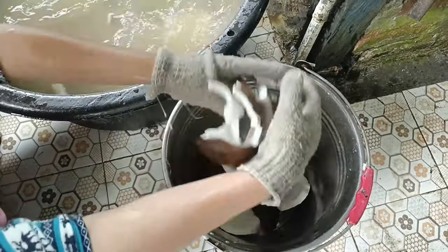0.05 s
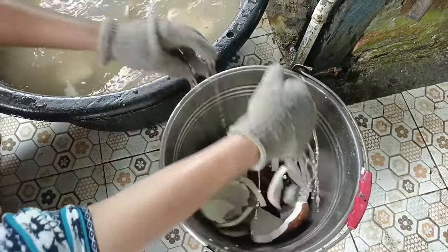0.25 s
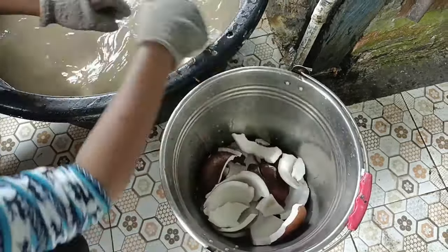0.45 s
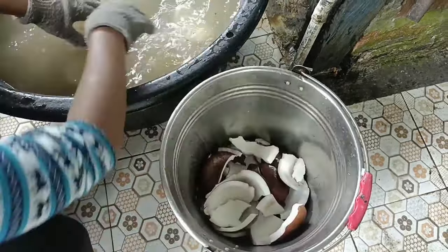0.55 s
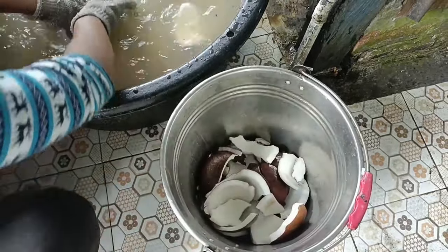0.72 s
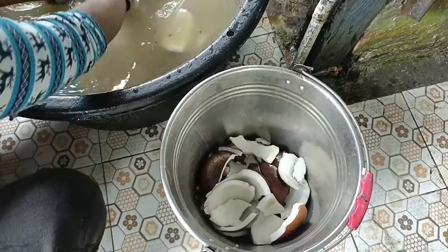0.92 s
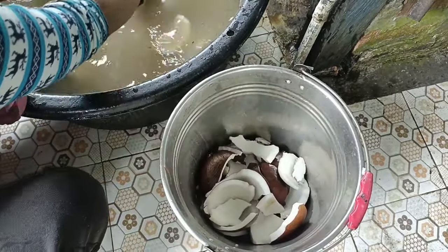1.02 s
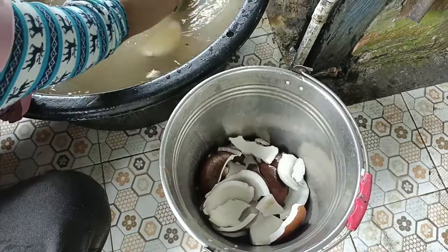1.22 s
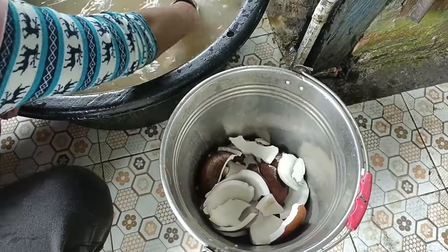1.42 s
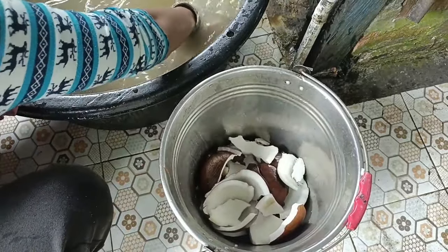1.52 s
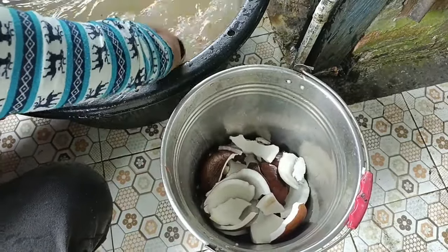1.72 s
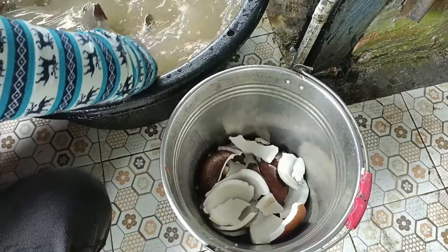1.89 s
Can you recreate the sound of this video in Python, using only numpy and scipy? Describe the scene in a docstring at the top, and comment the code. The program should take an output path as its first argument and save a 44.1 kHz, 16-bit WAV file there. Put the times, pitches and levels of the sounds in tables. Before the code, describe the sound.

Wet coconut chunks clatter into a metal bucket, then water quietly gurgles and drips in a basin

```python
"""Wet chunks of coconut tumble into a half-full metal bucket, close below a phone; then gloved hands stir the basin.
Chunks: clunks that excite damped bucket modes, and noise ticks in three bands for the clatter.
Narrow pitched runs of damped sines: ringing ends of the bucket clatter near 0.52 s, water gurgles elsewhere.
Water: single damped sines (plops and plips), low noise (slosh), bright grains (spray, drops) and fizz in
flickering narrow bands (murmur); a faint rumble lies below.
"""
import sys
import numpy as np
from scipy import signal
from scipy.fft import rfft, irfft
from scipy.io import wavfile
from scipy.ndimage import uniform_filter1d

SR = 44100
rng = np.random.default_rng(int(sys.argv[2]) if len(sys.argv) > 2 else 0)


def dump(signal):
    """Clip the signal to [-1, 1] and save it as 16-bit WAV at the path in sys.argv[1]."""
    limited = np.clip(np.atleast_2d(signal).T, -1, 1)
    pcm = np.round(limited * 32767).astype(np.int16)
    wavfile.write(sys.argv[1], SR, pcm)


N = 85995
T = np.arange(N) / SR

# Levels are relative; colour tables are normalised to rms 1. Positive left-right is louder at the left.
# narrow pitched runs, ringing ends of the bucket clatter near 0.52 s, water gurgles elsewhere:
# (start [s], length [s], mean pitch [Hz], level [dB], left-right [dB])
PITCHED_RUNS = [(0.0, 0.024, 4190, -42, -6), (0.064, 0.1, 6200, -43.5, 0), (0.078, 0.058, 776, -49, 3),
                (0.093, 0.099, 4548, -33.5, -5), (0.094, 0.064, 5340, -38.5, -11),
                (0.103, 0.06, 3210, -43, -3), (0.139, 0.088, 3970, -32, -8), (0.147, 0.052, 5730, -42, -4),
                (0.159, 0.029, 4280, -27, -1), (0.162, 0.034, 1984, -38, -5),
                (0.162, 0.041, 1152, -33.5, 7), (0.163, 0.038, 1356, -40, 2), (0.165, 0.032, 1680, -43, 9),
                (0.518, 0.049, 4290, -36.5, -6.5), (0.523, 0.05, 3226, -39, -4),
                (0.526, 0.072, 880, -51, 7), (0.638, 0.077, 3820, -52, -28), (0.64, 0.17, 3045, -41, 6.5),
                (0.65, 0.028, 4520, -38, -9.5), (0.696, 0.045, 1444, -49, 0), (0.697, 0.12, 4493, -42, -9),
                (0.718, 0.16, 5380, -43.5, -11.5), (0.719, 0.032, 2070, -38.5, 12),
                (0.719, 0.09, 4900, -42, -3), (0.737, 0.05, 1650, -51, 8), (0.761, 0.05, 2600, -49.5, 18.5),
                (0.768, 0.12, 2098, -52, 9), (0.83, 0.072, 5390, -56, -1), (0.91, 0.06, 2090, -45, 0),
                (0.908, 0.07, 5405, -45.5, -10), (1.004, 0.03, 2416, -46.5, -10),
                (1.034, 0.061, 4070, -39.5, -9.5), (1.035, 0.1, 5400, -47, -9), (1.05, 0.05, 1300, -46, 0),
                (1.054, 0.048, 3880, -34, -1.5), (1.062, 0.07, 2920, -41.5, 16),
                (1.065, 0.039, 2610, -44.5, -14.5), (1.067, 0.043, 3430, -29.5, -0.5),
                (1.135, 0.069, 777, -42.5, 4), (1.144, 0.033, 4440, -43, -8),
                (1.148, 0.054, 3170, -35, -7.5), (1.215, 0.037, 759, -41, 2), (1.254, 0.22, 779, -41.5, 4),
                (1.277, 0.16, 5500, -46, -11), (1.279, 0.036, 4020, -54, -15), (1.285, 0.04, 5900, -45, -3),
                (1.286, 0.057, 1957, -41, -13), (1.305, 0.12, 936, -41.5, 2.5), (1.319, 0.031, 627, -40, 0),
                (1.324, 0.034, 795, -38, -3), (1.33, 0.048, 1623, -39.5, 6),
                (1.365, 0.05, 3770, -47.5, -12), (1.368, 0.056, 2006, -39.5, 0),
                (1.407, 0.032, 3970, -42, -10.5), (1.442, 0.093, 873, -45, 5), (1.513, 0.1, 1000, -45, 15),
                (1.517, 0.028, 1414, -35, -2), (1.533, 0.05, 3730, -40.5, -5),
                (1.553, 0.065, 910, -34.5, -0.5), (1.555, 0.06, 4350, -44, -3),
                (1.556, 0.025, 3260, -45.5, 19), (1.574, 0.046, 1983, -34.5, 2),
                (1.626, 0.036, 3390, -39, 2), (1.625, 0.081, 1376, -45, 4), (1.651, 0.17, 781, -56, 15),
                (1.7, 0.04, 5680, -52, -4), (1.701, 0.042, 4360, -40.5, -10), (1.706, 0.076, 2880, -48, 23),
                (1.783, 0.038, 1837, -33.5, -1), (1.788, 0.045, 4705, -40, -10),
                (1.797, 0.048, 5050, -54, 2), (1.823, 0.063, 849.5, -49, 20), (1.845, 0.05, 2350, -40, 9),
                (1.85, 0.033, 6540, -34.5, -2), (1.867, 0.086, 3014, -47, 18),
                (1.871, 0.025, 3400, -40, -8), (1.903, 0.048, 5400, -43, -8.5),
                (1.896, 0.055, 2128, -31, 7.5), (1.9, 0.067, 4410, -39, -8), (1.904, 0.04, 3860, -40, -14),
                (1.906, 0.034, 1980, -33, -8), (1.934, 0.015, 1510, -37.5, 13)]
# plops and plips, single bubbles, low and high: (time [s], level [dB], initial pitch [Hz], decay constant [ms])
SINGLE_BUBBLES = [(0.092, -39, 4540, 4.5), (0.638, -38.5, 4510, 6), (1.055, -28, 3940, 4.7),
                  (1.144, -37, 4320, 5.4), (1.26, -33, 814, 3.9), (1.31, -16.5, 727, 5.5),
                  (1.518, -20.5, 845, 5.6), (1.703, -37, 4560, 5.6), (1.786, -24, 1857, 8.4),
                  (1.9, -36, 2100, 7.4)]
# slosh against the tub, two stretches: (time [s], level of the low band [dB], level of the high band [dB])
SLOSH_LEVELS = [
    [(0.0, -47, -52), (0.026, -45.5, -78), (0.042, -53, -84), (0.058, -49, -80), (0.092, -45, -43.5),
     (0.11, -50, -47), (0.152, -48, -51.5), (0.17, -62, -51.5), (0.184, -63, -35.5), (0.2, -27, -51)],
    [(0.5, -56, -38), (0.552, -63, -44), (0.62, -54, -77), (0.66, -58.5, -70), (0.704, -55.5, -90),
     (0.73, -57, -71), (0.762, -79, -64), (0.838, -75.5, -87), (0.89, -70, -81), (0.916, -54.5, -79),
     (0.94, -60, -69), (0.964, -67.5, -89), (1.004, -75, -63.5), (1.024, -70.5, -83), (1.084, -52.5, -75.5),
     (1.116, -63, -76), (1.142, -43.5, -55), (1.162, -41, -53), (1.186, -52, -64), (1.214, -41, -31.5),
     (1.262, -43, -38.5), (1.29, -43.5, -47), (1.326, -73, -34.5), (1.372, -50, -47.5), (1.392, -50.5, -67),
     (1.428, -65, -59), (1.48, -54, -79), (1.508, -54, -70), (1.546, -68, -69.5), (1.61, -40.5, -48.5),
     (1.658, -50.5, -56), (1.738, -48, -56), (1.76, -47, -67), (1.816, -59, -49.5), (1.832, -66, -52.5),
     (1.868, -61, -65), (1.924, -52, -57), (1.95, -52, -63)],
]
# slosh, low band spectrum: (frequency [Hz], density [dB per Hz])
SLOSH_LOW_COLOUR = [(25, -20), (50, -20), (80, -7.5), (110, 2.5), (160, 1), (230, -11.5)]
# slosh, high band spectrum: (frequency [Hz], density [dB per Hz])
SLOSH_HIGH_COLOUR = [(170, -20.5), (240, 8), (340, 4.5), (480, -11.5), (650, -23.5)]
# rumble spectrum: (frequency [Hz], density [dB per Hz])
RUMBLE_COLOUR = [(20, -6.5), (40, -5), (70, -0.5), (110, -11.5)]
# fine spray, two stretches: (time [s], level [dB])
SPRAY_LEVELS = [
    [(0.0, -53), (0.016, -56), (0.056, -62), (0.062, -65), (0.066, -56), (0.076, -54), (0.122, -52),
     (0.13, -57), (0.174, -53), (0.184, -61), (0.2, -47)],
    [(0.5, -55), (0.616, -61.5), (0.652, -55), (0.734, -53.5), (0.774, -62), (0.79, -54), (0.818, -65.5),
     (0.886, -48), (0.936, -64), (0.984, -58.5), (0.992, -72), (1.008, -52.5), (1.04, -56), (1.116, -63),
     (1.126, -56), (1.302, -63), (1.318, -52.5), (1.368, -62), (1.444, -55.5), (1.554, -48.5), (1.586, -59),
     (1.63, -47), (1.674, -56), (1.748, -57.5), (1.772, -61), (1.804, -52), (1.824, -56.5), (1.86, -51.5),
     (1.916, -57), (1.95, -58)],
]
# spray and drop spectrum: (frequency [Hz], density [dB per Hz])
DROPLET_COLOUR = [(3240, -41), (5500, -22), (6230, -28), (6580, -10.5), (7140, -23.5), (7830, 1.5),
                  (9370, -10), (10400, 1), (11500, -10), (12400, -5.5), (15200, -16), (16200, -23),
                  (16500, -36)]
# water murmur, two stretches: (time [s], level [dB])
MURMUR_LEVELS = [
    [(0.0, -58.5), (0.096, -57.5), (0.15, -54.5), (0.2, -42.5)],
    [(0.5, -52.5), (0.58, -61.5), (0.734, -55.5), (0.988, -61), (1.122, -54), (1.234, -58), (1.368, -57),
     (1.52, -54), (1.626, -55.5), (1.738, -55), (1.95, -51)],
]
# murmur spectrum: (frequency [Hz], density [dB per Hz])
MURMUR_COLOUR = [(240, -41.5), (400, -12), (546, -16), (861, -12.5), (1070, -15), (1200, -12.5),
                 (1370, 1.5), (1790, -7.5), (2060, -3.5), (2780, -9), (4550, -7.5), (5010, -18),
                 (5510, -5.5), (6060, -16), (7000, -9), (9100, -42.5), (15400, -120)]
# murmur balance: (frequency [Hz], left-right [dB])
MURMUR_BALANCE = [(400, 2), (1200, -1), (2500, -1), (4500, -3.5), (7000, -11)]
# droplets: (time [s], level [dB], left-right [dB])
DROP_TICKS = [(0.0645, -24, 14), (0.1521, -31.5, 7), (0.1698, -27.5, 6), (0.1945, -34, 1.0),
              (0.209, -35, 3), (0.4, -31, -0.5), (0.4622, -27, 13), (0.5392, -40, 11), (0.6509, -34, 10),
              (0.6828, -31, 11), (0.7259, -32, -4.0), (0.7873, -36, 0.5), (0.8556, -38, -6),
              (0.885, -30, 15), (1.0072, -28, -0.5), (1.1243, -47, 26), (1.1503, -37, 13),
              (1.3169, -43, -9), (1.4485, -28, 11), (1.5158, -31, -9), (1.6082, -25, 2), (1.6247, -22, 10),
              (1.7389, -37, 14), (1.8048, -26.5, -9), (1.8537, -36, 12)]
# clatter of small wet chunks: (time [s], low-middle level [dB], high-middle level [dB], treble level [dB])
CLATTER_LEVELS = [(0.195, -49, -40, -54), (0.209, -40.5, -40, -25.5), (0.217, -28.5, -34, -40.5),
                  (0.225, -29, -28, -30.5), (0.235, -15.5, -26.5, -30.5), (0.249, -28, -31, -37),
                  (0.271, -17, -16, -25.5), (0.281, -15.5, -15.5, -23), (0.315, -17, -18.5, -20.5),
                  (0.347, -23.5, -25, -36), (0.371, -22, -28, -42.5), (0.393, -29, -35.5, -36.5),
                  (0.423, -36, -37, -40.5), (0.435, -25.5, -25, -40), (0.443, -31, -36.5, -42.5),
                  (0.469, -34, -37.5, -46.5), (0.517, -50, -56.5, -53), (0.523, -47, -51, -61),
                  (0.58, -78, -72, -71)]
# clatter, low-middle spectrum: (frequency [Hz], density [dB per Hz])
CLATTER_LOW_COLOUR = [(600, -14.5), (900, -5.5), (1290, 0.5), (1600, -6.5), (2300, -11)]
# clatter, high-middle spectrum: (frequency [Hz], density [dB per Hz])
CLATTER_MID_COLOUR = [(1500, -13), (2100, -2), (3300, -3), (4500, -7.5), (5800, -25.5)]
# clatter, treble spectrum: (frequency [Hz], density [dB per Hz])
CLATTER_TOP_COLOUR = [(2650, -39.5), (4500, -6), (8640, -12), (9410, -20), (10500, -11.5), (13900, -18.5),
                      (15500, -26), (16000, -36)]
# knocks of the larger chunks: (time [s], level [dB], contact [ms], chunk pitch [Hz])
CHUNK_KNOCKS = [(0.207, -11, 2.5, 302), (0.216, -9.5, .8, 1160), (0.223, -9, 1.2, 601),
                (0.229, 4.5, 1.5, 333.7), (.239, -4, .9, 510.3), (0.244, -1.5, .7, 860),
                (0.253, -12.5, 1.5, 330), (.262, -5.5, .8, 907), (0.268, -2, 1.5, 284),
                (.282, -4.5, 1.5, 321), (0.303, -8, .5, 1250), (.316, -5.5, .9, 412),
                (.319, -9.5, .6, 1210), (.328, -11.5, .8, 790), (.341, -4, .8, 695), (.347, -11, 1.5, 335),
                (0.364, -33.5, .8, 920), (.379, -21, .8, 390), (0.39, -21.5, 1.1, 450),
                (.402, -17.5, .8, 810), (.421, -12, 2.5, 286), (.429, -4, 1.43, 609.5),
                (.436, -9, 0.88, 448.4), (.444, -15, 2.5, 313), (.456, -23, 4.3, 283),
                (0.48, -20, 0.96, 336)]
# modes of bucket and heap: (mean frequency [Hz], mean level [dB], t60 before wet damping [s])
BUCKET_MODES = [(130.5, -22.5, .15), (205, -12.5, .12), (264.6, -3.5, 0.13), (296, -7, 0.25),
                (354.6, -12, 0.14), (420.2, -12, 0.3), (495.4, -7, .1), (601, -11.5, 0.15), (711, -6, 0.11),
                (790.6, -15, 0.18), (835, -20.5, 0.25), (840, -18.5, 0.6), (995, -15, .08), (1105, -11, .1),
                (1283, -4.5, 0.09), (1554, -11.5, .08)]

RUN_RINGS, RING_SCATTER_DB, RUN_FADE_DB = 24, 4, 11.5
RING_DECAY_AT_2KHZ_S, RING_SPREAD_AT_2KHZ_HZ = 0.015, 70
SWELL_CYCLES = 1.3  # onset of a ring
SINGLE_GLIDE = 0.015  # phase stretch per decay constant
LEFT_LAG_S = .00018  # the basin reaches the left port later
RUMBLE_DB = -62
SPRAY_PER_S, SPRAY_SPREAD_DB = 5000, 2.5
MURMUR_FLICKER_DB = 3.5
DROP_DECAY_S, DROP_TAIL_DECAY_S, DROP_TAIL_DB = 0.00082, .012, -13
CLATTER_PER_S, CLATTER_SPREAD_DB, CLATTER_TAIL_S = 2500, 3.5, .003
MODE_SCATTER_DB, MODE_DETUNE = 6, 0.02068  # detune as a fraction of frequency
CHUNK_DB, CHUNK_CYCLES = -0.5, 2.5
WET_DAMP_S = .17  # the wet heap chokes every ring after about this long
CEILING, LOW_HZ, TOP_HZ = .78, 85, 15900


def undb(db):
    """dB to gain."""
    return 10 ** (np.asarray(db) / 20)


def unit(x):
    """Scale to rms 1."""
    return x / np.sqrt(np.mean(x ** 2))


def colour(x, table):
    """Filter by (Hz, dB) points on a log frequency axis, -90 dB outside them; rms 1."""
    hz, db = np.array(table, float).T
    log_hz = np.log(np.arange(N // 2 + 1) * SR / N + 1)
    gain = undb(np.interp(log_hz, np.log(hz), db, left=-90, right=-90))
    return unit(irfft(rfft(x) * gain, N))


def curve(table, column):
    """Gain over time from one dB column; -120 dB outside the table."""
    rows = np.array(table, float)
    return undb(np.interp(T, rows[:, 0], rows[:, column], left=-120, right=-120))


def stretches(tables, column):
    """Summed gain curves of separate stretches of time."""
    return sum(curve(table, column) for table in tables)


def add(out, start_s, x):
    """Mix x into out from start_s."""
    i = int(start_s * SR)
    out[..., i:i + x.shape[-1]] += x[..., :max(N - i, 0)]


def pair(correlation):
    """Left and right noise of the given correlation."""
    correlation = np.clip(correlation, 0, 1)
    mid, side = rng.standard_normal((2, N))
    return np.sqrt(1 + correlation) * mid + np.sqrt(1 - correlation) * side * np.array([[1], [-1]])


def grains(per_s, spread_db, tail_s):
    """Envelope of random ticks with exponential tails."""
    hits = rng.random(N) < per_s / SR
    ticks = hits * undb(spread_db * rng.exponential(size=N))
    return signal.lfilter([1], [1, -np.exp(-1 / (tail_s * SR))], ticks)


def walk(rate_hz):
    """Slow random wander, spread near 1."""
    k = int(SR / rate_hz)
    steps = np.repeat(rng.standard_normal(N // k + 1), k)
    return 1.52 * uniform_filter1d(uniform_filter1d(steps, k), k)[:N]


def panned(db):
    """Left and right gains."""
    return undb(np.array([[db / 2], [-db / 2]]))


def damped_ring(t, hz, decay_s, glide):
    """Damped sine that swells from t = 0 at both ports; positive glide raises the pitch."""
    u = np.maximum(np.array([t - LEFT_LAG_S, t]), 0)
    swell = 1 - np.exp(-(u * hz / SWELL_CYCLES) ** 2)
    phase = 2 * np.pi * hz * u * (1 + glide * u / decay_s)
    return swell * np.exp(-u / decay_s) * np.sin(phase)


def pitched_runs():
    """Gurgles and ringing bucket ends: fading runs of damped sines of near pitch; higher ones decay faster."""
    out = np.zeros((2, N))
    chance = rng.standard_normal((len(PITCHED_RUNS), 3, RUN_RINGS, 1))
    place = np.arange(RUN_RINGS)[:, None] / RUN_RINGS
    for (s, length_s, hz, level_db, pan_db), (shift, detune, scatter) in zip(PITCHED_RUNS, chance):
        onset_s = np.clip(place + 0.032 * shift, 0, 1) * length_s
        t = T[:int((length_s + .06) * SR)] - onset_s
        f = hz + RING_SPREAD_AT_2KHZ_HZ * detune * (hz / 2000) ** .5
        decay_s = RING_DECAY_AT_2KHZ_S * (hz / 2000) ** -.4
        size_db = level_db - 7 - RUN_FADE_DB * place + RING_SCATTER_DB * scatter
        size = undb(size_db) * np.sqrt(length_s / 0.062)
        run = (size * damped_ring(t, f, decay_s, 0)).sum(axis=1)
        add(out, s, run * panned(pan_db))
    return out


def plops_and_plips():
    """Single bubbles, low and high, each a damped sine of rising pitch."""
    out = np.zeros((2, N))
    for s, level_db, hz, decay_ms in SINGLE_BUBBLES:
        add(out, s, undb(level_db) * damped_ring(T[:SR // 8], hz, decay_ms / 1000, SINGLE_GLIDE))
    return out


def slosh():
    """Lapping against the tub: low noise in two bands, partly shared by the ports."""
    low = colour(pair(0.63), SLOSH_LOW_COLOUR)
    high = colour(pair(0.42), SLOSH_HIGH_COLOUR)
    return low * stretches(SLOSH_LEVELS, 1) + high * stretches(SLOSH_LEVELS, 2)


def rumble():
    """Faint steady noise in the bass."""
    return colour(pair(.6), RUMBLE_COLOUR) * undb(RUMBLE_DB)


def spray():
    """Fine crackle of droplets: dense noise grains, a little to the left."""
    hiss = colour(grains(SPRAY_PER_S, SPRAY_SPREAD_DB, .002) * pair(.3), DROPLET_COLOUR)
    return hiss * stretches(SPRAY_LEVELS, 1) * panned(2.5)


def murmur():
    """Fine fizz of noise grains in narrow bands that flicker each on its own."""
    spec = rfft(colour(grains(4000, 3.5, 0.0028) * pair(.1), MURMUR_COLOUR))
    hz = np.arange(N // 2 + 1) * SR / N + 1
    balance_db = np.interp(hz, *np.array(MURMUR_BALANCE).T)
    spec = spec * undb(balance_db * np.array([[.5], [-.5]]))
    fizz = np.zeros((2, N))
    for k in range(59, 91):  # triangular bands, 1/7 octave apart
        band = irfft(spec * np.clip(1 - 7 * abs(np.log2(hz) - k / 7), 0, 1), N)
        fizz += band * undb(MURMUR_FLICKER_DB * walk(22))
    return fizz * stretches(MURMUR_LEVELS, 1)


def drops():
    """Droplets: short bright noise ticks with a wisp of spray after them."""
    out, t = np.zeros((2, N)), T[:3000]
    hiss = colour(pair(.3), DROPLET_COLOUR)
    shape = np.exp(-t / DROP_DECAY_S) + undb(DROP_TAIL_DB) * np.exp(-t / DROP_TAIL_DECAY_S)
    for s, level_db, pan_db in DROP_TICKS:
        i = int(s * SR)
        add(out, s, undb(level_db - 10.5) * hiss[:, i:i + 3000] * shape * panned(pan_db))
    return out


def clatter():
    """Dense ticks of small chunks and the water shaken off them; each band has its own ticks."""
    low, mid, top = [grains(CLATTER_PER_S, CLATTER_SPREAD_DB, CLATTER_TAIL_S) for _ in range(3)]
    low = colour(low * pair(0.042), CLATTER_LOW_COLOUR) * curve(CLATTER_LEVELS, 1)
    mid = colour(mid * pair(0.18), CLATTER_MID_COLOUR) * curve(CLATTER_LEVELS, 2)
    top = colour(top * pair(.4), CLATTER_TOP_COLOUR) * curve(CLATTER_LEVELS, 3) * panned(2)
    return low + mid + top


def bucket():
    """Knocks: a short clunk of the chunk plus bucket modes, excited less at high pitch by long contacts."""
    out, t = np.zeros((2, N)), T[:SR // 3]
    hz, mode_db, t60_s = np.array(BUCKET_MODES, float).T[:, :, None]
    chance = rng.standard_normal((len(CHUNK_KNOCKS), 4, len(BUCKET_MODES), 1))
    # phase difference between the ports grows with mode frequency
    port_spread = np.clip(hz / 1500, .05, 1) ** 1.3
    wet_damping = np.exp(-(t / WET_DAMP_S) ** 4)
    for (s, level_db, contact_ms, own_hz), (scatter, detune, turn, phase) in zip(CHUNK_KNOCKS, chance):
        f = hz * (1 + MODE_DETUNE * detune)
        gain = undb(level_db + mode_db + MODE_SCATTER_DB * scatter - 10.5)
        ring = gain * np.exp(-np.log(1000) * t / t60_s - (f * contact_ms / 1500) ** 2)
        shift = turn * port_spread
        rings = np.array([(ring * np.sin(2 * np.pi * f * t + side * shift + phase)).sum(0)
                          for side in (1, -1)])
        clunk = np.exp(-t * own_hz / CHUNK_CYCLES) * np.sin(2 * np.pi * own_hz * t)
        clunk = undb(level_db + CHUNK_DB) * clunk
        attack = np.minimum(t * 1000 / contact_ms, 1)
        add(out, s, (rings + clunk) * wet_damping * attack)
    return out


def scene():
    """Basin and bucket together."""
    soft = pitched_runs() + plops_and_plips() + slosh() + rumble() + spray() + murmur() + drops()
    return soft + clatter() + bucket()


def record(dry):
    """The phone rounds the loudest peaks, drops the deep bass and cuts the top."""
    rounded = CEILING * np.tanh(dry / CEILING)
    thin = signal.sosfilt(signal.butter(3, LOW_HZ, "high", fs=SR, output="sos"), rounded)
    return signal.sosfilt(signal.ellip(12, .2, 90, TOP_HZ, fs=SR, output="sos"), thin)


dry = scene()
out = record(dry)
dump(out)
```